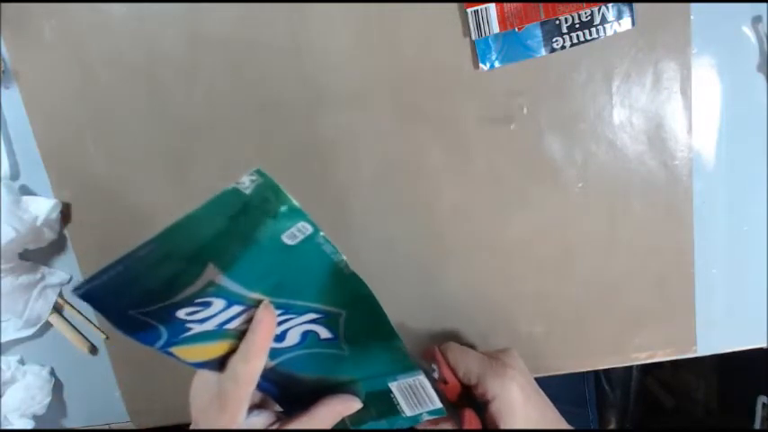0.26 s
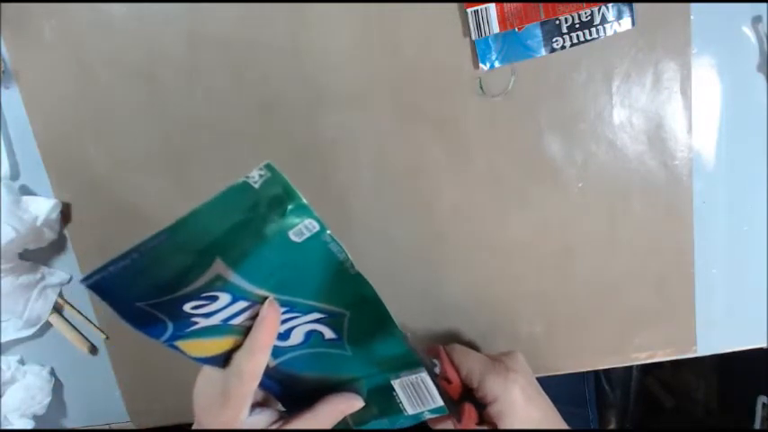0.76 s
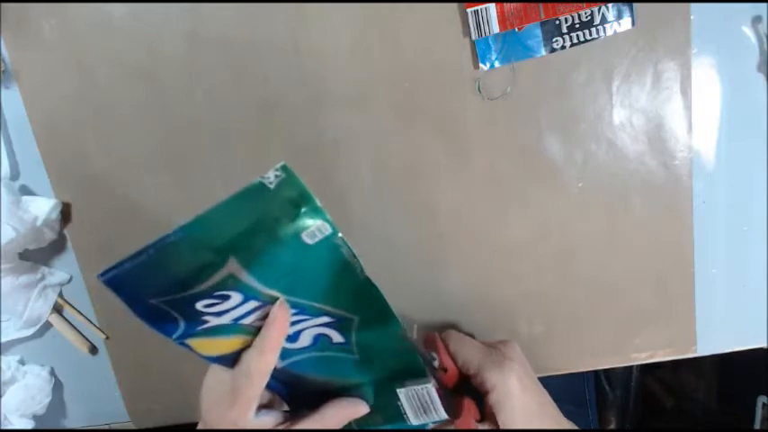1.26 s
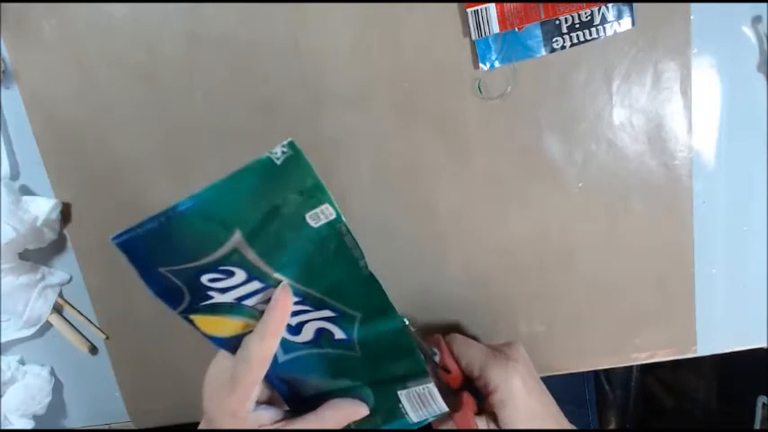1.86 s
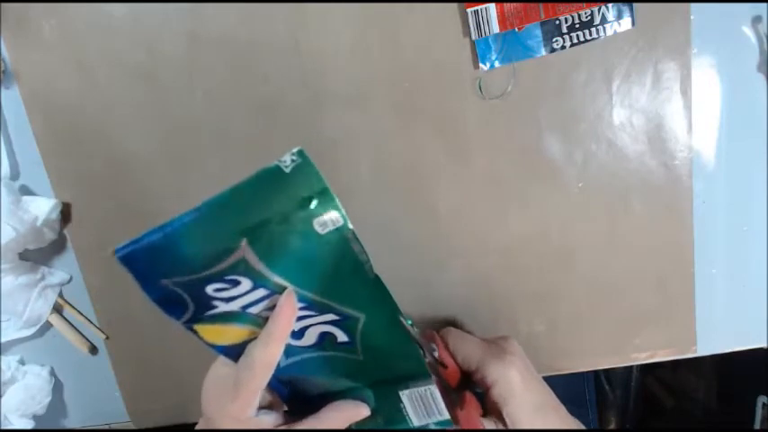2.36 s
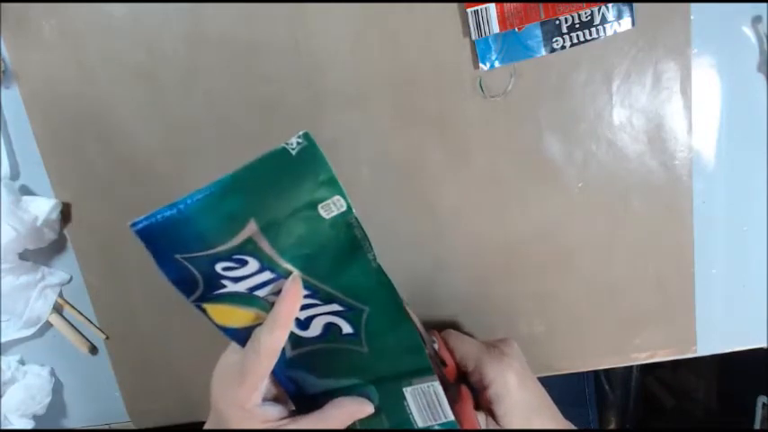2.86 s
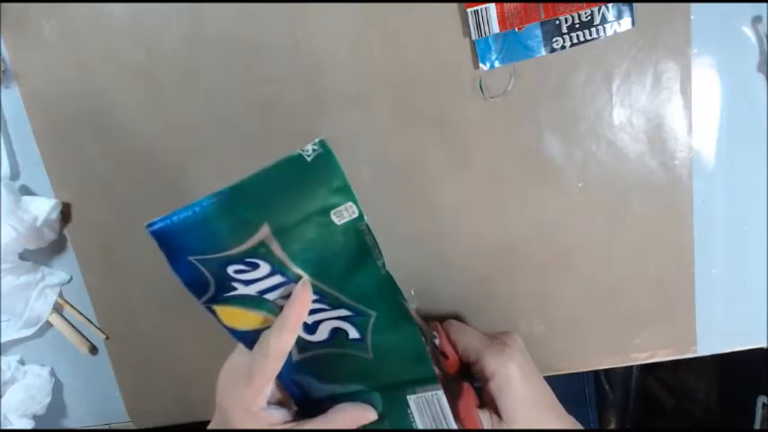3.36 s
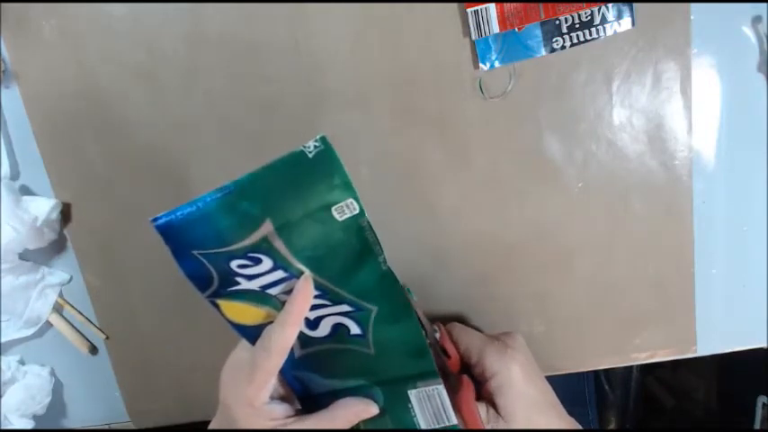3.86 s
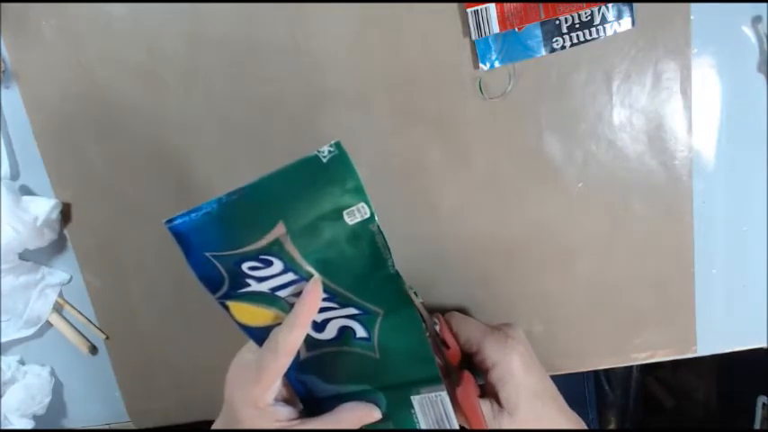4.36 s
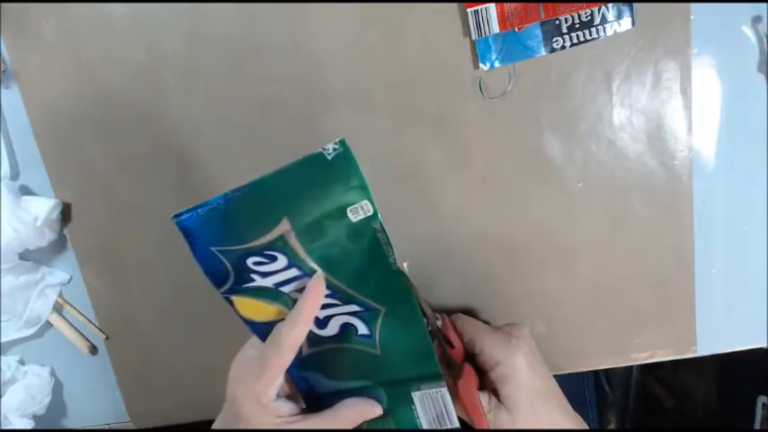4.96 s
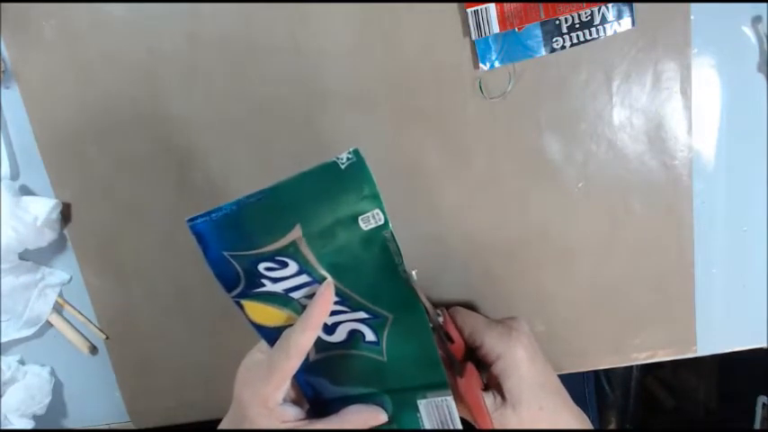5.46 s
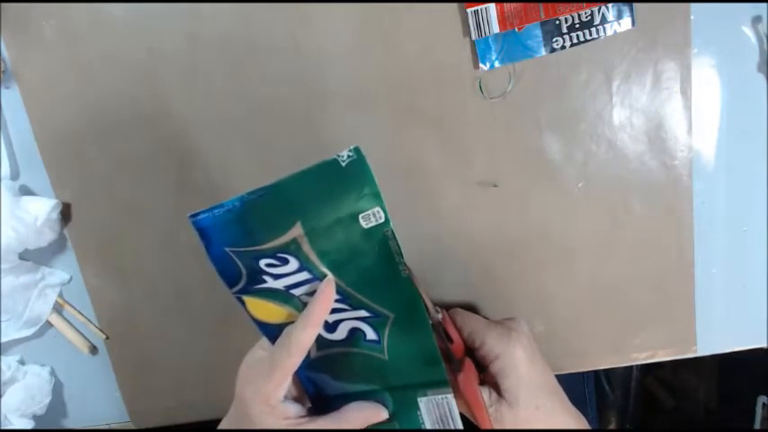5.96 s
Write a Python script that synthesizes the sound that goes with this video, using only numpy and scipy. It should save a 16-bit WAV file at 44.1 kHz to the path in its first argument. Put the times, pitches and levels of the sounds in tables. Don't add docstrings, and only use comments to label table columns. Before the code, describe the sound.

Close, dry clicks and tearing snips of blades cutting thin aluminium indoors, the sheet briefly ringing, above a faint growing rumble.

```python
import sys
import numpy as np
from scipy import signal
from scipy.fft import rfft, irfft
from scipy.io import wavfile
from scipy.ndimage import uniform_filter1d

SR = 44100
rng = np.random.default_rng(int(sys.argv[2]) if len(sys.argv) > 2 else 0)


def to_linear_factor(level_db):
    exponent = np.asarray(level_db, float) / 20
    return 10 ** exponent


def waveform_to_disk(signal):
    frames = np.transpose(np.atleast_2d(signal))
    scaled = np.clip(frames, -1, 1) * 32767
    samples = np.round(scaled).astype(np.int16)
    wavfile.write(sys.argv[1], SR, samples)


N = 273905

# time in seconds, level in dB.
RUMBLE_LEVEL = [(0.0, -56), (0.5, -57), (1.3, -58), (1.9, -58.5), (2.5, -51.5), (3.1, -53), (4.35, -45.5),
                (4.9, -47), (5.6, -44.5), (6.21, -45.5)]
# frequency in Hz, density in dB per Hz.
RUMBLE_SPECTRUM = [(8.8, -33.5), (15, -3), (26, -0.5), (39, -6), (50, 6), (123, -7.5), (146, -6.5),
                   (177, -13.5), (265, -14), (305, -22.5), (420, -21.5), (550, -37.5), (920, -120)]
# middle in seconds, half length in seconds,
# depth in dB.
LULLS = [
    (0.15, 0.081, 7.5),
    (0.67, 0.051, 9.5),
    (1.5, 0.19, 5.5),
    (2.22, 0.16, 16),
    (2.94, 0.15, 10),
    (4.44, 0.058, 5.5),
    (5.69, 0.059, 2),
]
# frequency in Hz, density in dB per Hz.
AIR_SPECTRUM = [(120, -74), (200, -15.5), (478, -11.5), (562, -3.5), (802, -17.5), (1740, -18.5),
                (2290, -21), (2490, -48), (3970, -53.5), (5570, -49), (9500, -26), (12400, -101),
                (20900, -120)]
AIR_DB = -64.5
# frequency in Hz, width in Hz, level in dB against the rumble.
HUM_LINES = [(26, 8.5, -9.5), (52.3, 16, -5.5), (83, 13, -12), (119.96, 11, -3.5)]
# frequency in Hz, decay time T60 in seconds.
ROOM_T60 = [(500, .25), (2000, 0.25), (9000, 0.15)]
ROOM_DB, DRUM_ROOM = -6.5, 0.46

# frequency in Hz, width in Hz, level in dB.
SHEET_MODES = [(554, 160, -16.5), (898, 78, -1), (1110, 54, 6), (1710, 17, -9), (2080, 430, -10),
               (2440, 28, 3), (2260, 16, -17), (3660, 430, -9.5), (4340, 15, 3.5), (4250, 62, -5),
               (5010, 5.3, -4), (6840, 64, -19), (7650, 110, -15.5), (8010, 48, 5), (8470, 230, 5),
               (9140, 560, 10)]
# fullest moment in seconds, swell in seconds, fade in seconds, level in dB, sheet thump in dB.
SHEARS = [
    (0.261, 0.12, 0.029, -55, 1),
    (1.185, 0.071, 0.14, -51.5, -8.5),
    (1.879, 0.011, 0.095, -57, -10),
    (3.236, 0.17, 0.0058, -61, -1),
    (4.197, 0.21, 0.048, -64, -7),
    (5.231, 0.49, 0.15, -68, -10.5),
    (6.21, 0.069, 0.11, -43.5, -17.5),
]
# fullest moment in seconds, swell in seconds, fade in seconds, level in dB, sheet thump in dB.
DRAGS = [(0.01, 0.11, 0.14, -71.5, 3.5), (0.528, 0.081, 0.53, -62.5, -12), (0.76, 0.66, 0.14, -68, -5),
         (1.1, 0.92, 0.02, -72, -2), (1.263, 0.016, 0.026, -47, -22), (1.376, 0.32, 0.48, -66.5, -18),
         (1.766, 0.23, 0.1, -51.5, -50), (2.114, 0.063, 0.35, -45, -13.5), (2.753, 0.095, 0.29, -53, -14.5),
         (3.661, 0.4, 0.58, -57.5, -10), (4.485, 0.22, 0.11, -60.5, -12), (4.621, 0.15, 0.061, -56.5, 1.5),
         (4.769, 0.18, 0.16, -59.5, -40), (4.948, 0.14, 0.045, -56, -21), (5.656, 0.27, 0.92, -56.5, -14.5),
         (6.14, 0.15, 0.13, -61.5, -37)]
SHEAR_BRIGHT_DB, DRAG_BRIGHT_DB, RESTING_DB = 4.5, -1, -88.5
SLIDE_RANGE_DB = 25
# start in seconds, fullest in seconds, end in seconds, level in dB.
STROKES = [
    (0.168, 0.202, 0.36, -51.5),
    (1.142, 1.152, 1.213, -43.5),
    (1.87, 1.888, 1.917, -41.5),
    (3.12, 3.158, 3.314, -47.5),
    (4.109, 4.132, 4.29, -47.5),
    (5.106, 5.195, 5.24, -49),
    (6.178, 6.205, 8.6, -36.5),
]
# start in seconds, length in seconds, level in dB, pitch in Hz, width in Hz.
CHATTER = [(0.589, 0.023, -49.5, 4700, 400), (0.656, .02, -55.5, 4420, 300), (0.7, 0.015, -59.5, 7800, 600),
           (0.745, 0.065, -61, 7800, 505), (0.51, .3, -67, 6610, 300), (0.77, 0.021, -53.5, 3200, 400),
           (0.876, 0.021, -49, 2730, 513), (1.152, 0.045, -45, 550, 195), (1.145, 0.018, -41.5, 1250, 248),
           (1.176, 0.017, -45.5, 2490, 151), (1.247, 0.013, -40.5, 1150, 253),
           (1.252, 0.013, -42, 2536, 150), (1.583, .012, -39, 7950, 2000), (1.677, 0.0082, -32, 8240, 1500),
           (1.689, 0.032, -39, 2275, 713), (2.532, 0.016, -39.5, 754, 200), (2.534, 0.012, -34, 1395, 296),
           (2.551, 0.025, -48, 760, 152), (2.572, 0.05, -53, 1110, 40), (3.136, 0.015, -44, 2020, 202),
           (3.138, .02, -46.5, 940, 300), (3.148, 0.022, -45.5, 2440, 100), (3.162, 0.086, -49.5, 1110, 60),
           (3.191, 0.019, -49, 2440, 150), (3.192, 0.023, -50, 2110, 198), (4.126, 0.0175, -44.5, 924, 200),
           (4.13, .025, -43, 4250, 254), (4.142, 0.021, -44, 2130, 200), (4.166, 0.051, -46.5, 1870, 404),
           (4.186, 0.012, -42, 1112, 200), (4.19, 0.014, -46, 2355, 200), (5.128, 0.034, -55, 2440, 198),
           (5.147, 0.049, -54, 1110, 101), (5.75, 0.026, -35.5, 952, 514), (5.761, 0.048, -36, 7360, 2920),
           (5.765, 0.033, -40.5, 1565, 820), (5.75, 0.0079, -35.5, 3800, 494),
           (5.751, .012, -30, 6760, 600), (4.913, 0.066, -55.5, 607, 249), (4.762, 0.0083, -34, 8950, 1200)]
# start in seconds, peak in dB, pitch in Hz, T60 in seconds.
DRUMS = [(0.6, -45.5, 585, 0.05), (0.882, -39, 601, 0.055), (1.135, -24, 1927, 0.03),
         (1.527, -36.5, 572, 0.06), (1.558, -37, 574, 0.082), (1.885, -27.5, 606, 0.075),
         (1.885, -29.5, 1135, 0.051), (2.127, -21, 1920, 0.023), (2.128, -22, 4140, 0.024),
         (2.129, -31, 904, 0.095), (2.328, -32.5, 1187, 0.059), (2.735, -40.5, 616, 0.036),
         (2.9, -37.5, 605, 0.045), (5.754, -33, 815, 0.029), (5.752, -25.5, 1612, 0.037),
         (5.753, -14.5, 2370, 0.034), (0.335, -43.5, 1710, 0.03), (1.25, -30.5, 1710, 0.065),
         (1.556, -36, 4720, 0.04), (1.588, -24.5, 4650, 0.028), (1.61, -34, 4640, 0.05),
         (1.686, -22, 8250, 0.035), (1.685, -25, 9140, 0.037), (2.125, -23.5, 1186, 0.048),
         (2.533, -32, 934, 0.052), (2.532, -32.5, 1170, 0.086), (2.73, -32, 4890, 0.051),
         (2.873, -38, 2110, 0.034), (2.9, -40.5, 2350, 0.048), (3.137, -35.5, 880, 0.073),
         (3.491, -43.5, 2460, 0.029), (3.535, -51, 2470, 0.021), (3.581, -32, 4230, 0.046),
         (3.59, -34.5, 608, 0.042), (3.899, -42, 1040, 0.02), (3.9, -37, 2363, 0.045),
         (4.578, -25.5, 2427, 0.029), (4.935, -39.5, 2370, 0.03), (5.755, -38, 1050, 0.059),
         (5.82, -48, 2324, 0.15), (1.525, -24.5, 3350, 0.045), (5.879, -44, 3900, 0.036)]
DRUM_RISE_S = 0.0019

# start in seconds, peak in dB, strongest ring in Hz, T60 in seconds.
BUMPS = [
    (0.333, -28, 1110, 0.085),
    (3.306, -40, 946, 0.37),
    (6.029, -39, 884, 0.051),
]
# start in seconds, peak in dB, strongest ring in Hz, T60 in seconds.
KNOCKS = [
    (0.591, -35, 4790, 0.21),
    (0.775, -37.5, 584, 0.084),
    (1.135, -27, 1890, 0.18),
    (1.227, -34, 2230, 0.055),
    (2.306, -36, 1110, 0.027),
    (2.5297, -19, 1885, 0.011),
    (2.569, -35, 1150, 0.079),
]
# start in seconds, peak in dB, strongest ring in Hz, T60 in seconds.
BITES = [(0.412, -50, 1110, 0.03), (0.662, -40.5, 4360, 0.021), (0.697, -42.5, 3230, 0.13),
         (0.751, -41.5, 3500, 0.089), (1.262, -24.5, 1710, 0.016), (1.8824, -11.5, 3660, 0.04),
         (1.913, -14.5, 5510, 0.058), (2.123, -10, 3410, 0.05), (2.325, -23.5, 1090, 0.036),
         (2.896, -29, 5650, 0.13), (3.164, -28, 1110, 0.32), (4.189, -28.5, 1160, 0.067),
         (4.69, -35, 6540, 0.04), (4.931, -32, 9140, 0.14), (5.148, -36, 1110, 0.32),
         (6.185, -22.5, 2310, 0.11)]
# start in seconds, peak in dB, strongest ring in Hz, T60 in seconds.
SNIPS = [(0.096, -36, 3760, 0.1), (0.391, -36.5, 710, 0.25), (1.938, -20.5, 8000, 0.13),
         (2.228, -29.5, 9140, 0.7), (3.138, -27, 8330, 0.071), (3.578, -22, 8330, 0.1),
         (3.668, -25.5, 5940, 0.014), (3.766, -27.5, 6530, 0.12), (3.894, -22.5, 3870, 0.087),
         (4.131, -22, 9150, 0.14), (4.493, -31.5, 6350, 0.054), (5.466, -37.5, 8350, 0.37),
         (5.516, -28.5, 4340, 0.092), (5.577, -24.5, 5010, 0.015)]
# start in seconds, peak in dB, strongest ring in Hz, T60 in seconds.
TICKS = [(0.878, -36.5, 3460, 0.027), (1.247, -17.5, 4340, 0.02), (2.782, -34.5, 4950, 0.031),
         (1.44, -35.5, 4800, 0.042), (1.473, -33, 2380, 0.017), (1.5218, -11, 5820, 0.056),
         (1.585, -27.5, 5100, 0.11), (1.6056, -15, 8820, 0.08), (1.685, -8, 7870, 0.057),
         (2.096, -26.5, 1850, 0.14), (2.828, -33, 9170, 0.13), (2.871, -28.5, 3450, 0.12),
         (3.533, -28.5, 8070, 0.069), (3.72, -35.5, 3440, 0.096), (4.444, -37, 6300, 0.03),
         (4.576, -21, 2590, 0.015), (4.722, -36.5, 4480, 0.069), (5.127, -33, 2414, 0.17),
         (5.75, -5, 9140, 0.026), (5.952, -52, 554, 0.049), (6.101, -28.5, 9080, 0.023)]
# start in seconds, peak in dB, strongest ring in Hz, T60 in seconds.
CLICKS = [(1.5538, -10.5, 8090, 0.07), (1.6458, -15.5, 8020, 0.12), (2.024, -37, 7720, 0.04),
          (2.682, -20.5, 8800, 0.075), (2.728, -19.5, 4500, 0.04), (3.486, -29, 4000, 0.046),
          (4.759, -21.5, 8880, 0.028), (5.875, -29.5, 8810, 0.036), (2.033, -35.5, 8090, 0.022),
          (2.256, -34, 9300, 0.04), (2.611, -36.5, 9500, 0.04), (3.349, -45.5, 8000, 0.12),
          (6.169, -27.5, 8600, 0.04)]
# sheet thump in dB, blade brightness in dB.
BUMP, KNOCK, BITE = (17, -21.5), (-0.15, -22.5), (-12, -17.5)
SNIP, TICK, CLICK = (-4.6, -9.5), (-35, -16), (-40.5, 1.9)
COLOUR_HZ = [250, 800, 2800, 8000, 9600]
# start in seconds, tear time in seconds.
TEARS = [(1.249, 0.0028), (1.522, 0.0031), (1.555, 0.0031), (1.606, 0.0032), (1.686, 0.0032),
         (1.883, 0.0039), (1.913, 0.0038), (2.124, 0.0039), (2.53, 0.0038), (2.68, 0.0018), (2.726, 0.0038),
         (2.871, 0.0032), (2.895, 0.0051), (3.486, 0.0051), (3.533, 0.0021), (3.578, 0.0044),
         (3.668, 0.0018), (3.766, 0.0052), (3.894, 0.0038), (4.493, 0.0031), (4.576, 0.0022),
         (4.758, 0.002), (4.931, 0.0046), (5.751, 0.0042), (6.102, 0.006), (0.592, 0.0021), (0.877, 0.0023),
         (4.131, 0.0037), (5.576, 0.0055), (1.585, 0.0034)]
RING_DB, PUFF_DB, RIP_DB, STRONG_DB = -5.5, -3.5, 1.5, 6
PATCHY_DB = 8

EDGE_HZ, HOP = 9900, 1411
# middle in seconds, half length in seconds, strength in
STARVED = [
    (0.7, 0.081, 3.5),
    (1.79, .12, 8),
    (2.21, 0.14, 13.5),
    (2.95, 0.059, 5),
    (5.75, 0.066, 2.5),
]
# middle in seconds, half length in
# seconds, strength in points of the gating score.
PAUSES = [(0.47, 0.061, -1), (1.0, 0.092, 1.2), (1.37, 0.043, 1), (2.04, .05, 0.5), (2.46, 0.051, 2.5),
          (2.61, .03, 0.5), (3.07, .045, 0.5), (3.42, 0.042, 2.5), (4.36, 0.069, 1.5), (4.665, 0.023, 1.5),
          (4.885, 0.025, 2.5), (5.05, 0.053, 2), (5.37, 0.08, 0.5), (5.99, 0.076, 1.5)]
# middle in seconds, half length in seconds, strength in points of
# the gating score, middle in Hz, half width in Hz.
HOLES = [(0.67, 0.2, 7.5, 5700, 800), (0.7, 0.31, 10, 13000, 970), (5.99, 0.099, 2, 6400, 2000),
         (5.95, 0.1, 6.5, 2500, 500), (3, 0.052, 14, 4100, 850), (4.26, .04, 9, 4300, 600),
         (1.64, .04, 3, 2000, 250), (1.9, 0.057, 6, 3200, 570), (5.53, .05, 4, 3100, 910),
         (0.12, .07, 4, 2300, 700), (0.11, .1, 2.5, 3600, 500), (0.35, 0.062, 7, 6000, 1700),
         (3.5, 0.057, 8.5, 2000, 400), (3.77, 0.089, 4.5, 2600, 400), (6.2, .06, 8, 9200, 1100),
         (3.9, 0.045, 4, 3300, 600), (2.27, .06, 5, 8400, 450), (1.8, .04, 4, 9300, 700),
         (1.6, .06, 6.5, 1600, 300), (0.51, .05, 3.5, 8700, 1500), (2.3, 0.039, 4.5, 6900, 2200),
         (2.7, .07, 2, 3200, 1200), (6, .08, 1.5, 4500, 2000)]
# middle in seconds, half length in seconds, depth in dB.
LEVEL_DIPS = [
    (1.502, .013, 11),
]
# frequency in Hz, level in dB.
FIZZ_SPECTRUM = [(1200, -54), (2000, -49.5), (9500, -18.5), (10000, -19), (11900, -19.5), (12100, -27.5),
                 (15000, -29.5), (15700, -34.5), (15900, -83)]
FIZZ_DB = 1.5
# middle in seconds, half length in seconds, change in dB.
FIZZ_SPELLS = [
    (1.26, 0.045, -12),
    (1.577, 0.24, -10.5),
    (3.2, 0.14, 5),
    (4.7, 0.23, -11),
    (5.682, 0.078, 25),
    (5.79, 0.1, 5),
    (6.21, 0.046, 19),
]
# middle in seconds, half length in seconds, change in dB.
FLARES = [
    (1.56, 0.05, 15.5),
    (6.2, .035, 1.5),
    (3.35, 0.045, 3),
    (5.745, .035, -9),
]


def evened(x):
    return x / np.sqrt(np.mean(x ** 2) + 1e-20)


def read(points, hz):
    f, value = np.transpose(points)
    return np.interp(np.log(hz + 1), np.log(f + 1), value)


def shaped(x, points):
    return irfft(rfft(x) * to_linear_factor(read(points, np.fft.rfftfreq(len(x), 1 / SR))), len(x))


def resonate(x, hz, width):
    turn = np.exp(2j * np.pi * hz * np.arange(len(x)) / SR)
    r = np.exp(-np.pi * width / SR)
    return 2 * (turn * signal.lfilter([1 - r], [1, -r], x / turn)).real


def humps(rows):
    t = np.arange(N) / SR
    return sum(db * np.maximum(1 - abs(t - s) / half, 0) for s, half, db in rows)


def background():
    rumble = evened(shaped(rng.standard_normal(N), RUMBLE_SPECTRUM))
    hum = np.zeros(N)
    for hz, width, db in HUM_LINES:
        line = resonate(resonate(rng.standard_normal(N), hz, width), hz, width)
        hum += to_linear_factor(db) * evened(line)
    air = evened(shaped(rng.standard_normal(N), AIR_SPECTRUM))
    lumps = uniform_filter1d(uniform_filter1d(rng.standard_normal(N), size=2500), size=1500)
    lumps_db = 1.9 * evened(lumps)
    s, db = np.transpose(RUMBLE_LEVEL)
    swell_db = np.interp(np.arange(N) / SR, s, db)
    lull_db = humps(LULLS)
    return to_linear_factor(swell_db - lull_db - 4.5 + lumps_db) * (rumble + hum) + to_linear_factor(AIR_DB - 0.42 * lull_db) * air


def room(x):
    taps = np.zeros(SR // 2)
    at = np.arange(200, len(taps) - 20, 20)
    taps[at + rng.integers(0, 20, len(at))] = rng.choice([-1., 1.], len(at))
    hz, t, z = signal.stft(taps, SR, nperseg=256)
    tail = signal.istft(z * to_linear_factor(-60 * t / read(ROOM_T60, hz)[:, None]), SR, nperseg=256)[1]
    return signal.fftconvolve(x, tail / np.linalg.norm(tail))[:N]


def slides():
    t = np.arange(N) / SR
    full, swell, fade, db, thump_db = np.transpose(SHEARS + DRAGS)[:, :, None]
    distance = np.maximum((full - t) / swell, (t - full) / fade)
    power = to_linear_factor(2 * (db - SLIDE_RANGE_DB * distance))
    total = power.sum(0) + to_linear_factor(2 * RESTING_DB)
    shear = power[:len(SHEARS)].sum(0)
    drag = power[len(SHEARS):].sum(0)
    bright_db = (SHEAR_BRIGHT_DB * shear + DRAG_BRIGHT_DB * drag) / total
    return 10 * np.log10(total), (power * thump_db).sum(0) / total, bright_db


def pressure(level_db):
    t, gain = np.arange(N) / SR, to_linear_factor(level_db)
    for start, full, end, db in STROKES:
        stroke = np.interp(t, [start, start + 0.0025, full, end], [0, 0.3, 1.0, 0.014])
        gain = np.hypot(gain, to_linear_factor(db) * stroke)
    return gain


def chatter(drive):
    out = np.zeros(N)
    for s, length, db, hz, width in CHATTER:
        part = drive[round(s * SR):][:round(length * SR)]
        spell = np.sin(np.pi * np.linspace(0, 1, len(part)) ** 0.55)
        rung = evened(resonate(resonate(part, hz, width), hz, width))
        out[round(s * SR):][:len(part)] += to_linear_factor(db) * spell * rung
    return out


def scrape():
    level_db, thump_db, bright_db = slides()
    slip_size = to_linear_factor(3.1 * np.minimum(rng.exponential(1, N), 4))
    slips = rng.choice([-1., 1.], N) * slip_size * (rng.random(N) < 4000 / SR)
    clumps = to_linear_factor(2.5 * evened(uniform_filter1d(rng.standard_normal(N), size=500)))
    drive = clumps * (evened(slips) + 0.53 * rng.standard_normal(N))
    rung = drive + sum(to_linear_factor(db + 17.5) * resonate(drive, hz, width) for hz, width, db in SHEET_MODES)
    low = shaped(rung, [(300, -34.5), (550, 12.5), (950, 6.0), (1250, 7.5), (2000, -25.5)])
    mid = shaped(rung, [(1100, -28.0), (1600, -10.5), (5500, -10.5), (6500, -55.0)])
    high = shaped(rung, [(5400, -3.5), (6200, 12.5), (9600, -7.0)])
    bands = to_linear_factor(thump_db) * evened(low) + evened(mid) + to_linear_factor(bright_db) * evened(high)
    return pressure(level_db) * bands + chatter(drive)


def drums():
    out, t = np.zeros(N), np.arange(6144) / SR
    for s, db, hz, t60 in DRUMS:
        ring = to_linear_factor(db - 60 * t / t60) * (1 - np.exp(-t / DRUM_RISE_S)) * np.sin(2 * np.pi * hz * t)
        out[round(s * SR):][:len(t)] += ring
    return out


def colour(thump_db, bright_db):
    levels_db = [thump_db - 6.5, thump_db + 3, 0, bright_db + 15.5, bright_db + 14.5]
    return list(zip(COLOUR_HZ, levels_db))


def tear_time(s, usual):
    at, length = np.transpose(TEARS)
    near = abs(at - s).argmin()
    return length[near] if abs(at[near] - s) < .007 else usual


def snap(s, db, hz, thump_db, bright_db, t60, chance, crack):
    t = np.arange(len(crack)) / SR
    t60 = np.clip(t60, .02, .3)
    tint = colour(thump_db, bright_db)
    tear_s = tear_time(s, 0.0016 + 0.0014 * chance[2, 0])
    tear = crack * t * np.exp(-t / tear_s)

    lasting_hz, width, lasting_db = np.transpose(SHEET_MODES)
    passing_hz = 500 + 9200 * chance[0, len(SHEET_MODES):]
    mode_hz = np.r_[lasting_hz, passing_hz]
    mode_db = np.r_[lasting_db + 3, 0 * passing_hz] + read(tint, mode_hz) - 12 * chance[1]
    mode_t60 = t60 * (0.5 + 0.7 * chance[2]) * (3000 / mode_hz) ** 0.35
    decay = to_linear_factor(mode_db[:, None] - 60 * t / mode_t60[:, None])
    rings = decay * np.sin(2 * np.pi * mode_hz[:, None] * t)
    strong = to_linear_factor(read(tint, hz) + STRONG_DB - 60 * t / (0.21 * t60)) * np.sin(2 * np.pi * hz * t)
    body = signal.fftconvolve(tear, rings.sum(0) + strong)[:len(t)]

    puff = shaped(crack * to_linear_factor(-60 * t / (1.2 * t60)) * (1 - np.exp(-t / 0.0032)), tint)
    patches = list(zip(np.sort(passing_hz), PATCHY_DB * chance[1, len(SHEET_MODES):]))
    puff = shaped(puff, patches)

    burst = (1 - np.exp(-t / 0.0013)) * np.exp(-(t / (2.9 * tear_s)) ** 3)
    rip = shaped(crack[::-1] * burst, tint)
    rip = rip + 2.8 * resonate(rip, hz, 700)
    sound = to_linear_factor(RING_DB) * evened(body) + to_linear_factor(PUFF_DB) * evened(puff) + to_linear_factor(RIP_DB) * evened(rip)
    return to_linear_factor(db) * sound / abs(sound).max()


def bites():
    kinds = [(BUMP, BUMPS), (KNOCK, KNOCKS), (BITE, BITES), (SNIP, SNIPS), (TICK, TICKS), (CLICK, CLICKS)]
    rows = sorted((s, db, hz, *tint, t60) for tint, table in kinds for s, db, hz, t60 in table)
    out, size = np.zeros(N), 6144
    chances = rng.random((len(rows), 3, 56))
    cracks = rng.standard_normal((len(rows), size))
    for (s, *row), chance, crack in zip(rows, chances, cracks):
        part = out[round(s * SR):][:size]
        part += snap(s, *row, chance, crack)[:len(part)]
    return out


def scene():
    highpass = signal.butter(6, 470, "high", fs=SR, output="sos")
    contact = signal.sosfilt(highpass, bites()) + scrape()
    ringing = drums()
    echoes = to_linear_factor(ROOM_DB) * room(contact + DRUM_ROOM * ringing)
    return (contact + ringing + echoes + background())[None]


def smooth(x, lines, frames):
    return uniform_filter1d(uniform_filter1d(x, size=lines, axis=1), size=frames, axis=0)


def surviving(lines, band_db, frame_db, hz):
    narrow, broad = rng.standard_normal((2, *lines.shape))
    narrow = evened(smooth(narrow, 3, 15))
    broad = evened(smooth(broad, 40, 6))
    held = abs(smooth(lines ** 2, 4, 5))
    standing_db = 10 * np.log10(held / uniform_filter1d(held + 1e-14, size=30, axis=1) + 1e-14)
    loudness = np.clip((frame_db + 59) / 10, -1.3, 2.3)
    band_loudness = np.clip((band_db - frame_db) / 12, -1, .5)
    spared = read([(140, 5), (220, 5.5), (400, 5), (1100, 2.4), (1400, -.3), (2000, 0), (9000, 0)], hz)

    middle = (np.arange(len(lines)) - .5) * HOP
    after_bite = np.interp(middle, np.arange(N), humps(STARVED))[:, None]
    starved = after_bite * read([(120, 0), (170, 1), (340, 1), (460, 0)], hz)
    hush = np.interp(middle, np.arange(N), humps(PAUSES))[:, None] * (hz > 1800)
    s = middle[:, None] / SR
    for at, half, db, mid, wide in HOLES:
        in_time = np.maximum(1 - abs(s - at) / half, 0)
        in_band = np.maximum(1 - abs(hz - mid) / wide, 0)
        hush = hush + db * in_time * in_band
    score = 1.5 * narrow + .5 * broad + standing_db / 2.8
    score = score + loudness + band_loudness + spared - starved - hush
    return np.where(score > 0, 1, to_linear_factor(-28))


def coarsen_frames(x):
    n, k = np.arange(2 * HOP) + .5, np.arange(int(EDGE_HZ * 2 * HOP / SR)) + .5
    slope = np.clip((np.minimum(n, 2 * HOP - n) / HOP - .5) * 2.1 + .5, 0, 1)
    window = np.sin(np.pi / 2 * np.sin(np.pi / 2 * slope) ** 2)
    cosines = np.cos(np.pi / HOP * np.outer(n + HOP / 2, k))
    basis = np.sqrt(2 / HOP) * window[:, None] * cosines
    lead = HOP * 3 // 2
    padded = np.r_[np.zeros(lead), x, np.zeros(4 * HOP)]
    at = HOP * np.arange(N // HOP + 3)[:, None] + np.arange(2 * HOP)
    lines = padded[at] @ basis
    hz = k * SR / (2 * HOP)

    band = np.unique(np.round(np.sqrt(k + 30) * 2), return_inverse=True)[1]
    member = np.eye(band.max() + 1)[band]
    band_db = 10 * np.log10(lines ** 2 @ member / member.sum(0) + 1e-14)
    frame_db = 10 * np.log10((lines[:, hz > 500] ** 2).mean(1, keepdims=True) + 1e-14)
    wander_db = 1.9 * evened(uniform_filter1d(rng.standard_normal(band_db.shape), size=3, axis=0))
    quiet_db = read([(200, -75), (1200, -89), (1600, -54), (5000, -64.5), (9500, -50.5)], hz)
    masked_db = np.maximum(band_db - 7.5, frame_db - 24.0)[:, band]
    step_db = np.maximum(masked_db, quiet_db) + wander_db[:, band]
    step = to_linear_factor(step_db + read([(150, -11.5), (500, -4), (1500, 1.5), (9000, -1.0)], hz))
    rounded = np.sign(lines) * np.floor(abs(lines) / step + 0.4) * step
    rounded = rounded * surviving(lines, band_db[:, band], frame_db, hz)
    out = np.zeros(len(padded))
    np.add.at(out, at, rounded @ basis.T)
    return out[lead:lead + N]


def fizz(x):
    treble = shaped(x, [(3000, -41), (5000, 2.0), (9000, 5.5)])
    power = uniform_filter1d(uniform_filter1d(treble ** 2, size=900, origin=-350), size=600)
    level = np.sqrt(abs(power + to_linear_factor(-136)))
    hiss = shaped(rng.standard_normal(N), FIZZ_SPECTRUM)
    upper = shaped(hiss, [(11800, -40), (12300, 5), (14500, 3), (15200, -17.5)])
    return to_linear_factor(FIZZ_DB + humps(FIZZ_SPELLS)) * level * (hiss + (to_linear_factor(humps(FLARES)) - 1) * upper)


def roll_off(x):
    return signal.sosfilt(signal.butter(12, 15730, fs=SR, output="sos"), x)


def record(dry):
    kept = coarsen_frames(dry[0]) * to_linear_factor(-humps(LEVEL_DIPS))
    mix = (kept + fizz(kept))[None]
    return roll_off(mix)


dry = scene()
out = record(dry)
waveform_to_disk(out)
```